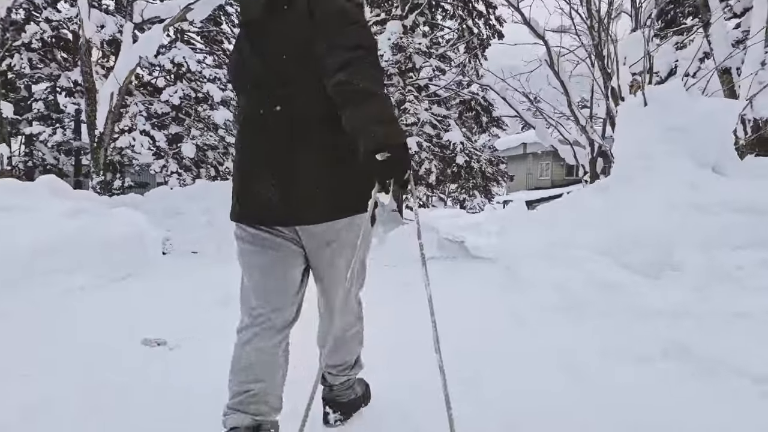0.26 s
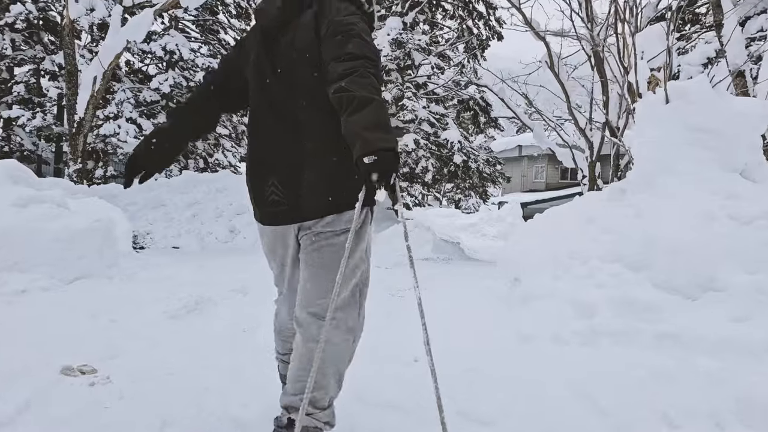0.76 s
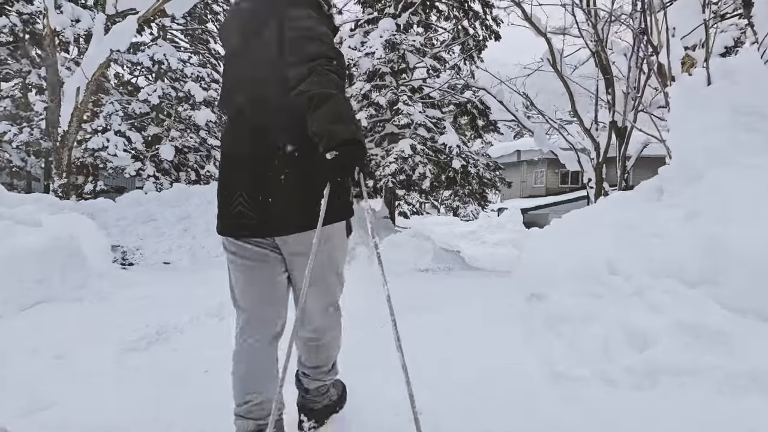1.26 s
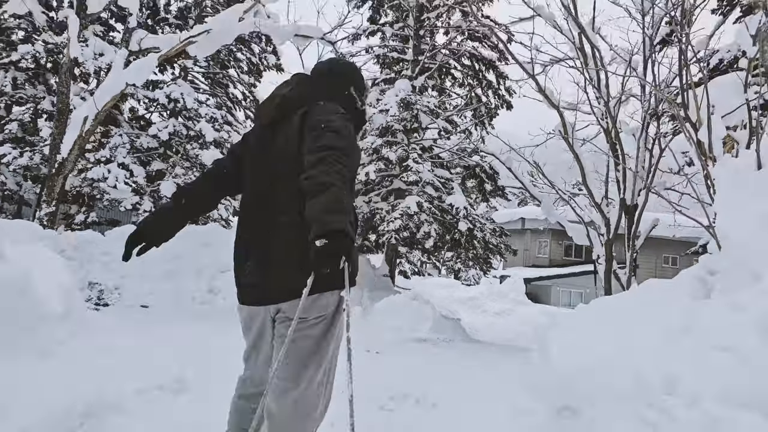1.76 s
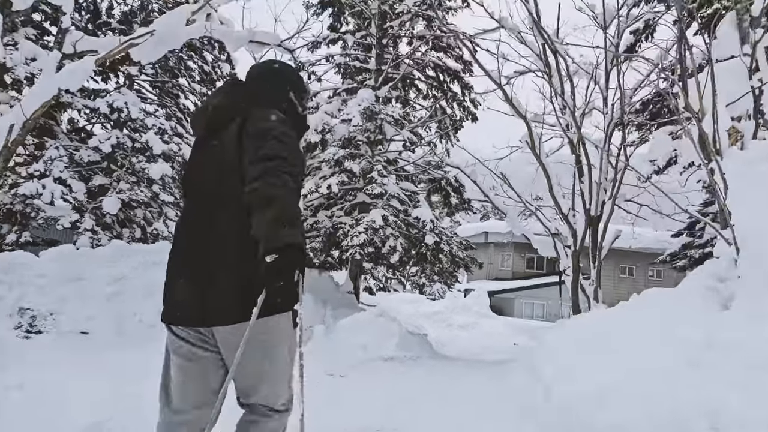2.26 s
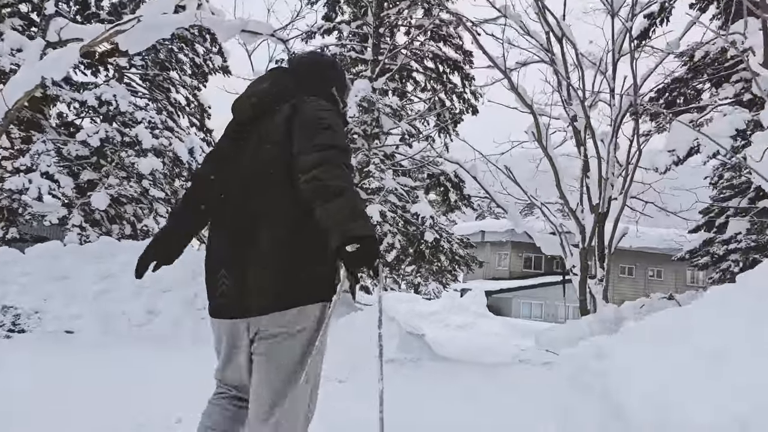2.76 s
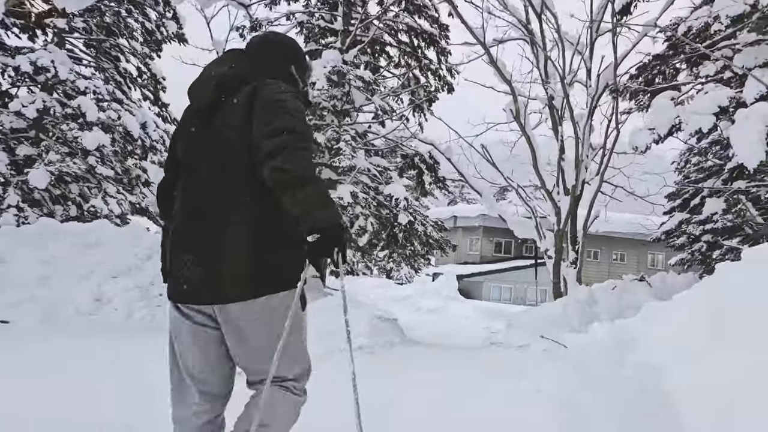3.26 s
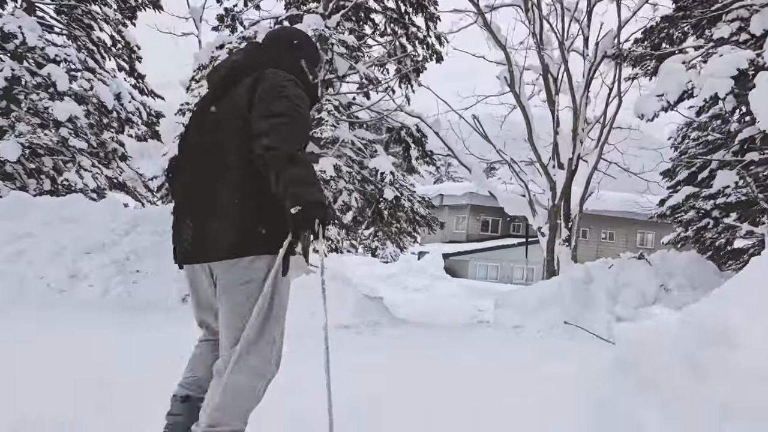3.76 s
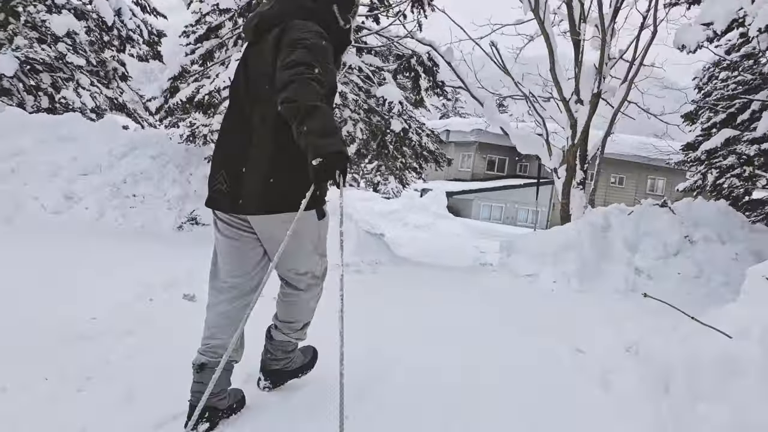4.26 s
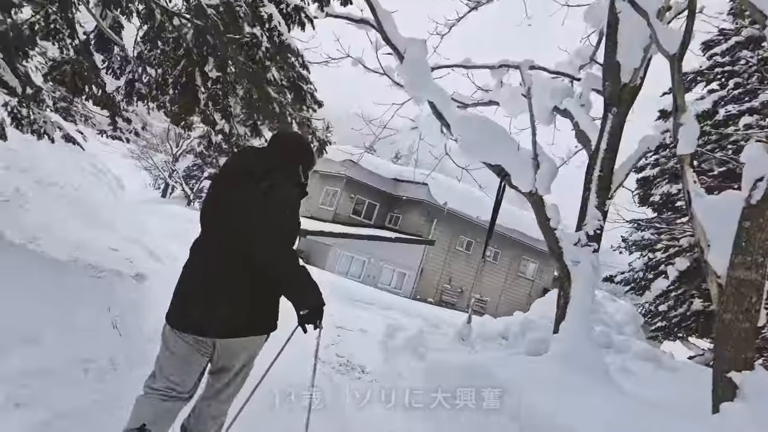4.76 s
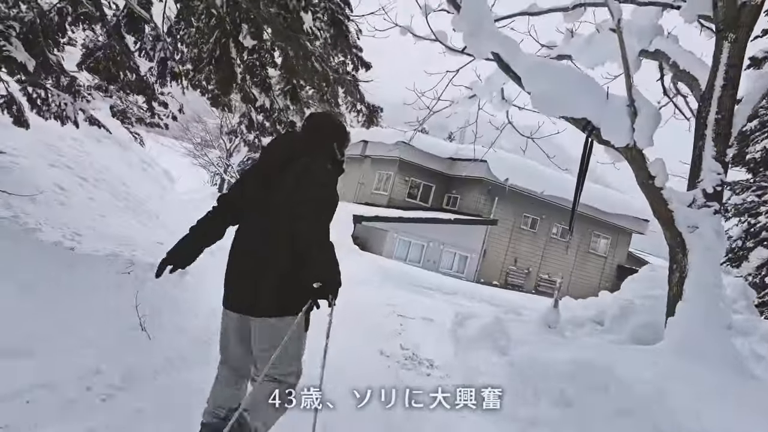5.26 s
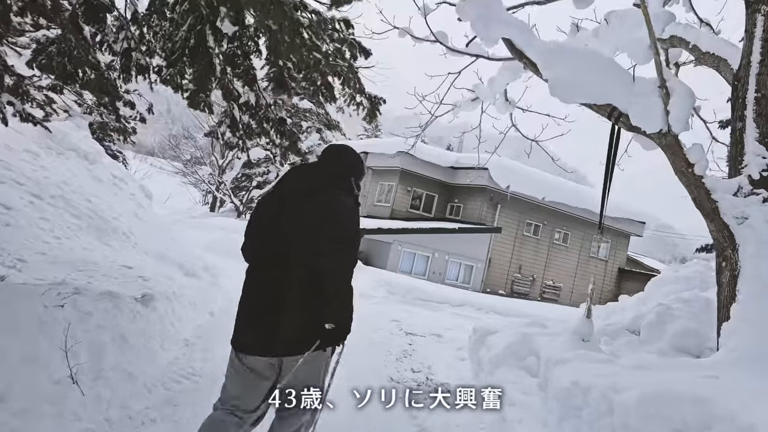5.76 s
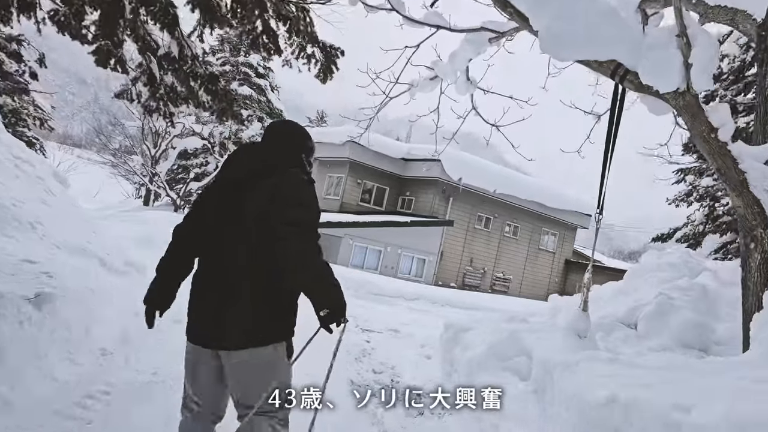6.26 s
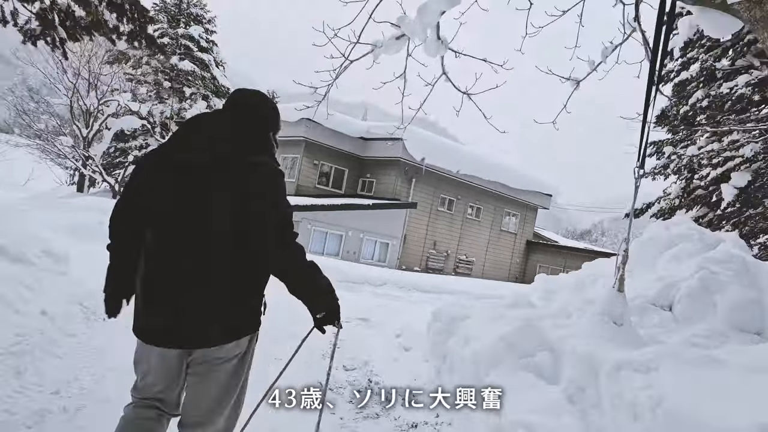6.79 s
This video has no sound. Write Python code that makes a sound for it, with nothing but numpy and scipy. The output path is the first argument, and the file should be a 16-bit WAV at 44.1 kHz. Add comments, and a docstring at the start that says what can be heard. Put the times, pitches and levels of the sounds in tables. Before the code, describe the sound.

Close, low hull knocks and uneven scraping from a plastic sled dragged through snow, with icy ticks, soft powder hiss and wind thumps.

```python
"""On lumpy snow, a hollow plastic sled is towed along, heard close up by a small stereo camera riding on it.
Shaped noise makes the hull rumble, crunch and jolt; lumps ring it as short decaying sine pairs.
Crust cracks and icy grains tick as dying noise bursts, and powder hisses in two bands of noise.
The camera swings round partway and hears the powder from the other side.
Low noise, almost unrelated left to right, is the wind buffeting the two microphone ports."""
import sys
import numpy as np
from scipy.fft import rfft, irfft, next_fast_len
from scipy.io import wavfile
from scipy.ndimage import map_coordinates

SR = 44100
rng = np.random.default_rng(int(sys.argv[2]) if len(sys.argv) > 2 else 0)


def file_out(sig):
    """Save sig as 16-bit WAV at sys.argv[1]."""
    # one column per channel
    cols = np.atleast_2d(sig).T
    # limit, then scale
    lim = np.clip(cols, -1, 1)
    pcm = np.round(lim * 32767).astype(np.int16)
    wavfile.write(sys.argv[1], SR, pcm)


N = 310023

# upper modes of the hull's shell, rung by breaking crust: (centre [Hz], width [Hz], level [dB])
SHELL_MODES = [(493, 83.5, 2), (713, 296, -2.5), (875, 400, -6.5), (1425, 300, -14.5), (1780, 600, -21.5)]


def amp(db):
    """Decibels to a linear gain."""
    return 10 ** (np.asarray(db) / 20)


def unit(x):
    """The signal scaled to an RMS of one."""
    return x / np.sqrt(np.mean(x ** 2) + 1e-20)


def along(points, hz):
    """Values read from (frequency [Hz], value) points on a log frequency axis."""
    f, v = np.transpose(points)
    return np.interp(np.log(hz + 1), np.log(f + 1), v)


def curves(rows):
    """One value per sample for each column after the time."""
    s, *cols = np.transpose(rows)
    return [np.interp(np.arange(N) / SR, s, c) for c in cols]


def bells(events):
    """Sum of bell curves around each (time [s], height, length [s])."""
    t = np.arange(0, N, 64) / SR  # a coarse grid is enough for such slow curves
    s, height, length = np.transpose(events)[:, :, None]
    total = (height * np.exp(-((t - s) / length) ** 2)).sum(0)
    return np.interp(np.arange(N) / SR, t, total)


def swells(events):
    """Gain that rises and falls around each (time [s], level [dB], length [s])."""
    return bells([(s, amp(db), length) for s, db, length in events])


def wobble(rate):
    """A smooth random curve with rate knots a second."""
    knots = rng.standard_normal(int(N * rate / SR) + 4)
    return map_coordinates(knots, [np.arange(N) * rate / SR])


def gritty(grit_db, rate):
    """Two noises whose shared strength jumps about, as grains catch and break."""
    return rng.standard_normal((2, N)) * amp(grit_db * wobble(rate))


def filtered(x, response):
    """The signal times a complex response of frequency."""
    m = next_fast_len(N + SR // 2)
    spectrum = rfft(x, m) * response(np.fft.rfftfreq(m, 1 / SR))
    return irfft(spectrum, m)[..., :N]


def body(modes):
    """Causal response of a set of resonances, with alternating signs."""
    def response(f):
        total = 0
        for k, (centre, width, db) in enumerate(modes):
            damping = 1j * f * width
            total = total + (-1) ** k * amp(db) * damping / (centre * centre - f * f + damping)
        return total
    return response


def spread(pair, alike):
    """Two unrelated signals mixed to left and right with a likeness per frequency."""
    def mix(hz):
        turn = np.arccos(np.clip(along(alike, hz), -1, 1)) / 2
        return np.array([np.cos(turn), np.sin(turn)])
    mid, side = filtered(pair, mix)
    return np.array([mid + side, mid - side])


def spread_out(size, alike):
    """A short stereo noise whose sides are partly alike."""
    mid, side = rng.standard_normal((2, size))
    turn = np.arccos(np.clip(alike, -1, 1)) / 2
    return np.cos(turn) * mid + np.sin(turn) * np.outer([1, -1], side)


def panned(db):
    """Left and right gains for a left-right difference."""
    return amp([[db / 2], [-db / 2]])


def scraping():
    """Small lumps drive the low hull modes, breaking crust the upper ones, and the load shakes the sled."""
    # how hard the hull drags: (time [s], rumble level [dB])
    drag = [(0.0, -40.5), (0.47, -41.5), (0.72, -46), (0.88, -40), (1.13, -40.5), (1.41, -33), (1.57, -31),
            (1.98, -42.5), (2.21, -39), (2.33, -39.5), (2.72, -43), (3.33, -31), (3.41, -32), (3.78, -33.5),
            (4.44, -36.5), (5.29, -33), (5.54, -32.5), (5.82, -37.5), (6.01, -35), (6.13, -32.5),
            (6.27, -36.5), (6.4, -36), (6.73, -32), (7.03, -35)]
    # the hull skips clear of the snow for a moment: (time [s], depth [dB], length [s])
    lulls = [(0.35, 11, 0.042), (0.62, 1.5, .06), (0.89, 5, .02), (1.15, 4.5, 0.026), (1.29, 7, 0.038),
             (1.37, 9, 0.019), (1.5, 12, 0.016), (2.08, 8, 0.073), (3.07, 7, 0.022), (3.28, 9, 0.12),
             (3.56, 14.5, 0.043), (4.0, 4, 0.018), (4.32, 9, 0.028), (4.6, 4, 0.055), (4.9, -1, .03),
             (5.075, 3, .015), (5.21, 0, .015), (5.89, 11.5, 0.044), (6.33, 6, 0.039), (6.56, 7, 0.077),
             (6.96, 4.5, 0.041)]
    # crust scraping along the shell: (time [s], level [dB], length [s])
    scrapes = [(0.78, -49, 0.026), (1.07, -48, 0.012), (1.32, -41, .012), (1.45, -62, 0.035),
               (1.54, -37, 0.01), (1.7, -55, 0.049), (1.98, -49, 0.029), (2.28, -53, 0.015),
               (2.45, -50, 0.036), (3.19, -54, 0.023), (3.415, -39.5, 0.043), (4.23, -52, 0.053),
               (4.56, -46, 0.01), (4.74, -46, 0.03), (4.99, -41, 0.043), (5.04, -36.5, 0.02),
               (5.105, -36.5, 0.021), (5.18, -36, 0.021), (5.235, -39, 0.014), (5.385, -39, 0.019),
               (5.57, -47, 0.011), (5.49, -46, 0.1), (5.99, -55, 0.038), (6.11, -44, 0.028),
               (6.41, -49.5, 0.052), (6.77, -39, 0.0083), (6.83, -40, .035)]
    # the load lurching on the hull: (time [s], level [dB])
    jolts = [(0.0, -35), (0.251, -37), (0.48, -34), (0.84, -29.5), (1.09, -36), (1.25, -39), (1.35, -38),
             (1.42, -25.5), (1.72, -41), (1.98, -41), (2.29, -39.5), (2.45, -36.5), (2.74, -36.5),
             (2.991, -32), (3.189, -26.5), (3.33, -34), (3.49, -39), (3.68, -40), (3.949, -45), (4.32, -31),
             (4.42, -43), (4.7, -29), (4.82, -27.5), (4.95, -52), (5.15, -34), (5.62, -35), (5.85, -35.5),
             (5.99, -45), (6.21, -40), (6.4, -34.5), (6.56, -33), (6.79, -39), (6.95, -37)]
    # low modes of the hull: (centre [Hz], width [Hz], level [dB])
    hull_modes = [(130, 19, -12.5), (176, 24.5, -4.5), (226.6, 26, -1), (297, 64, -5), (372, 77, -8.5),
                  (443, 130, -14)]
    # how alike the hull sounds at the two microphone ports: (frequency [Hz], likeness [0-1])
    hull_alike = [(100, 1), (300, 0.96), (640, 0.68), (1400, 0.16), (2500, 0)]
    # spectrum shape of the load shaking on the hull: (frequency [Hz], relative level per Hz [dB])
    thud = [(12, -34), (25, -15), (45, -3.5), (80, -2.5), (130, -4), (220, -22.5), (400, -120)]
    uneven_db = 0.54  # chance unevenness of the drag
    crunch_db, crunch_grows = -50.5, 0.61  # crunch at the mean drag level; its swing in dB per dB of drag
    jolt_s, shake_db = 0.024, -5.5  # length of a lurch; shaking between lurches, relative to the rumble

    drag_db, = curves(drag)
    drag_db = drag_db + uneven_db * wobble(10) - bells(lulls)
    crust = amp(crunch_db + crunch_grows * (drag_db - drag_db.mean())) + swells(scrapes)
    lurch = amp(drag_db + shake_db) + swells([(s, db, jolt_s) for s, db in jolts])

    soft = lambda hz: body(hull_modes)(hz) / (1 + 1j * hz / 900) ** 2  # powder cushions the contact
    shell = lambda hz: body(SHELL_MODES)(hz) * hz / (hz + 300)
    rumble = unit(filtered(gritty(grit_db=3.6, rate=46), soft))
    crunch = unit(filtered(gritty(grit_db=3, rate=70), shell))
    jolt = unit(filtered(gritty(grit_db=1.6, rate=12)[0], lambda hz: amp(along(thud, hz))))
    hull = spread(amp(drag_db) * rumble + crust * crunch, hull_alike)
    return hull * panned(-0.86) + lurch * jolt  # the jolt is the same on both sides


def powder(stance, band, grit_db, rate):
    """One band of powder hiss as it reaches the two ports, in stance 0 (before the turn) or 1 (after)."""
    # hiss spectrum shape in each stance: (frequency [Hz], relative level per Hz [dB])
    hiss_shape = [
        [(710, -11.5), (1200, -2), (1320, -3.5), (1520, -9), (1870, -6), (2260, -8), (3520, -6), (3960, -7),
         (6780, -11.5), (7470, -11), (8140, -14), (11550, -8.5), (12800, -14.5), (15000, -14.5), (15700, -16)],
        [(710, -21.5), (1200, -10), (1430, -5), (1550, -5), (1710, -13.5), (2080, -3.5), (2440, -13),
         (3060, -5.5), (5180, -6), (5900, -10.5), (7550, -10), (8780, -11), (10300, -6), (11600, -6.5),
         (15700, -15)],
    ]
    # left over right in each stance: (frequency [Hz], left-right difference [dB])
    lean = [
        [(1200, -1), (2000, -0.5), (3000, 1), (8300, 1.5), (9300, -6), (10500, -7), (11600, -6), (12500, -3),
         (13500, -1), (14500, 2), (15500, 0)],
        [(1200, -3), (1900, -9.5), (2400, 4), (3100, 5.5), (4100, 2), (5000, 3.5), (6000, 1.5), (8500, 3),
         (9300, -1.5), (10500, -0.5), (11500, -9), (12500, 11), (13300, -3), (14200, 9), (15500, 5)],
    ]
    # phase by which left leads right in each stance: (frequency [Hz], lead [radians])
    lead = [
        [(800, 1), (1700, -2.5), (2400, -2.5), (3500, -1.6), (4400, -2), (9000, -4), (10500, -4), (12000, -5.5),
         (14800, -4)],
        [(500, 7), (1000, 1), (2500, 2.5), (3200, 1.06), (8000, 2), (9000, 4.5), (11000, 2.5), (13000, 3),
         (15500, 6)],
    ]
    # how alike the two ports hear the hiss in each stance: (frequency [Hz], likeness [0-1])
    powder_alike = [
        [(1500, 0.48), (2400, 0.77), (4000, 0.046), (10000, 0.13), (14000, 0.12)],
        [(1500, 1), (2800, 0.64), (4000, 0.82), (7500, 0.25), (10300, 0.57), (13500, .35)],
    ]
    # the microphone port's resonance: (centre [Hz], width [Hz], height [dB])
    port = (11600, 350, 3)
    centre, width, height_db = port

    def ports(f):
        tone_db = along(hiss_shape[stance], f) + height_db * np.exp(-((f - centre) / width) ** 2)
        half = amp(along(lean[stance], f) / 2) * np.exp(.5j * along(lead[stance], f))
        return amp(tone_db) * band(f) * np.array([half, 1 / half])

    hiss = filtered(spread(gritty(grit_db, rate), powder_alike[stance]), ports)
    return hiss / np.sqrt(np.mean(hiss.mean(0) ** 2))  # the mean of left and right has unit RMS


def sliding():
    """Powder hisses in a fine and a duller part that swell separately and drift from side to side."""
    # fine snow sliding past: (time [s], fine hiss level [dB], duller part level [dB])
    slide = [(0.0, -52.5, -58.5), (0.47, -53.5, -57), (1.37, -52.5, -56), (1.55, -56, -61),
             (2.21, -55.5, -58), (2.45, -52.5, -54.5), (2.98, -53.5, -59), (3.39, -52.5, -58),
             (3.58, -53.5, -57), (4.07, -52.5, -56), (4.32, -56, -60.5), (4.52, -56.5, -53.5),
             (4.7, -50.5, -54), (5.05, -48, -49.5), (5.19, -46, -48.5), (5.42, -51, -52.5),
             (5.7, -52.5, -56.5), (5.99, -48.5, -55.5), (6.81, -50.5, -55), (7.03, -49, -54)]
    # powder thrown up in short sprays: (time [s], level [dB])
    sprays = [(0.21, -54.5), (0.48, -50.5), (0.8, -53), (1.31, -52.5), (1.45, -55), (1.72, -53),
              (1.94, -50.5), (2.29, -52.5), (2.82, -63), (2.92, -58), (3.17, -51), (3.43, -52.5),
              (3.95, -52.5), (4.48, -56), (4.56, -51), (4.7, -48.5), (4.76, -60), (4.95, -47), (5.03, -49),
              (5.11, -51), (5.19, -44), (5.38, -46), (6.44, -52), (6.87, -49)]
    turn_s = 4.55  # the camera swings round and hears the powder from the other side
    spray_s, spray_dull_db = 0.026, -4  # length of a spray; its duller part relative to the fine part
    lean_before_db, lean_after_db = -2, 1  # left-right difference about which the hiss drifts

    fine_db, dull_db = curves(slide)
    flicker = wobble(5.9)
    turned = np.arange(N) > turn_s * SR
    spray = swells([(s, db, spray_s) for s, db in sprays])
    drift_db = np.where(turned, lean_after_db, lean_before_db) + 2.9 * wobble(9.1)

    # the two bands cross at 7500 Hz and their powers add up to one
    high = lambda hz: np.sqrt(1 / (1 + (7500 / (hz + 1)) ** 8))
    low = lambda hz: np.sqrt(1 - high(hz) ** 2)
    fine_after = powder(1, high, grit_db=0.7, rate=90)
    fine_before = powder(0, high, grit_db=0.5, rate=130)
    dull_after = powder(1, low, grit_db=1.07, rate=87)
    dull_before = powder(0, low, grit_db=1.16, rate=72)

    fine_gain = np.hypot(amp(fine_db + 0.76 * flicker), spray)
    dull_gain = np.hypot(amp(dull_db + 1.5 * flicker), amp(spray_dull_db) * spray)
    fine = fine_gain * np.where(turned, fine_after, fine_before)
    dull = dull_gain * np.where(turned, dull_after, dull_before)
    return (fine + dull) * amp([drift_db / 2, -drift_db / 2])


def wind():
    """Eddies thump the two ports with almost unrelated low noise that swells on both together."""
    # wind at the microphone: (time [s], buffet level [dB])
    gusts = [(0.0, -58), (0.36, -64), (0.6, -54), (1.02, -38.5), (1.25, -53), (2.3, -54), (2.62, -42),
             (3.1, -56), (3.3, -47), (3.58, -59), (3.84, -41), (4.15, -48.5), (4.56, -32.5), (4.82, -28),
             (5.02, -54), (5.16, -36), (5.3, -55), (5.42, -39), (5.7, -39.5), (6.25, -42), (6.46, -43),
             (6.6, -35.5), (6.82, -50), (6.96, -32.5), (7.03, -48)]
    # spectrum shape of the buffeting: (frequency [Hz], relative level per Hz [dB])
    buffet = [(8.8, -42), (15, -23), (43, 3), (65, -2), (125, -6.5), (180, -18), (260, -16), (400, -50),
              (550, -120)]
    buffet_db, = curves(gusts)
    eddies = unit(filtered(gritty(grit_db=1.5, rate=16), lambda hz: amp(along(buffet, hz))))
    return amp(buffet_db) * spread(eddies, [(60, 0.033)])  # one likeness at every frequency


def bumps():
    """Each hard lump rings the loaded hull briefly at its pitch and one inharmonic overtone."""
    # lumps hitting the hull: (time [s], peak level [dB], pitch [Hz], overtone against pitch [dB])
    lumps = [(0.13, -34.5, 227, -10), (0.22, -28, 188, -11), (0.427, -20, 237, -10), (0.447, -18, 165, -1),
             (0.696, -23, 196, -2), (0.744, -22.5, 187, -11), (0.769, -22, 175, -4),
             (0.827, -27.5, 222.5, -19.5), (0.928, -27.5, 237, -19), (1.068, -25, 195, -11),
             (1.228, -31, 247, -21), (1.322, -21, 240, -16), (1.411, -13.5, 198, -22),
             (1.444, -18, 193, -14), (1.524, -10.5, 219, -19), (1.602, -28, 177, -14),
             (1.629, -19, 158, -19), (1.652, -12.5, 227, -9), (1.675, -15.5, 204.4, -12),
             (1.712, -16.5, 195, -9.5), (1.95, -23.5, 230, -19), (2.441, -24, 178, -19),
             (3, -15.5, 171.4, -7.5), (3.175, -15.5, 192, -4.5), (3.209, -26, 211, -17),
             (3.33, -9, 219.6, -10.5), (3.346, -12, 223, -17), (3.393, -16.5, 220, -8),
             (3.441, -21.5, 241, -12), (3.607, -27, 235, -7), (3.648, -22.5, 243, -5.5),
             (3.7, -19.5, 216, -5), (3.748, -27, 228, -20), (4.124, -23.5, 212, -2),
             (4.249, -24, 221, -4.5), (4.441, -20.5, 192, 4), (4.505, -21.5, 209, -11),
             (4.682, -18, 216, -8), (4.745, -18.5, 193, -0.5), (4.779, -19, 221, -3.5),
             (4.859, -36, 267, -5), (5.032, -15, 174, -1), (5.104, -16.5, 212, -2),
             (5.131, -11.5, 214, -10.5), (5.253, -20, 143, -14), (5.332, -22, 152, -6),
             (5.384, -22.5, 229, 5), (5.562, -21, 275, -14), (5.608, -8, 215, -10), (5.772, -28, 289, -18),
             (5.953, -27.5, 275, -22), (6.081, -25, 200, -13), (6.267, -25.5, 188, -19),
             (6.363, -23, 230, -18), (6.434, -26, 274, -19), (6.668, -24.5, 223, -8), (6.757, -24, 232, -7),
             (6.796, -19, 208, -9), (6.839, -24, 218, -4)]
    pitch_t60_s, over_t60_s = 0.097, 0.065
    ring = np.zeros(N + SR)
    t = np.arange(SR // 4) / SR
    press = (1 - np.exp(-t / 0.00078)) ** 2  # the lump is squeezed before it gives way
    for s, db, hz, over_db in lumps:
        swing = amp(-60 * t / pitch_t60_s) * press * np.sin(2 * np.pi * hz * t - 2.5)
        swing += amp(over_db - 60 * t / over_t60_s) * press * np.sin(2 * np.pi * 1.748 * hz * t - 1.5)
        ring[round(s * SR):][:len(t)] += amp(db) * swing / abs(swing).max()
    return ring[:N] * panned(-0.95)


def cracks():
    """A sharp blow with a dying crumble behind it, heard through the shell; ticks are one short snap."""
    # crust breaking against the shell: (time [s], level before the shell [dB], left-right difference [dB])
    breaks = [(0.448, -42, -21), (0.696, -44, -8), (1.445, -34, 2), (1.524, -31, 0), (1.599, -50, 2),
              (1.656, -33, -1.5), (2.58, -37, -1.5), (3.0, -38, -3), (3.181, -33, 1), (3.333, -28, -5),
              (3.397, -32, -3), (3.708, -34, 3), (4.112, -41, 0), (4.248, -35, -12), (4.441, -24, -6.5),
              (4.549, -48, 9), (4.689, -33, -4), (4.959, -32, 4), (5.037, -24.5, 4), (5.331, -31, -8),
              (5.608, -23.5, -2), (5.96, -29.5, -7), (6.041, -35.5, -11), (6.405, -28, -1),
              (6.435, -28, -5), (6.669, -31, -4), (6.794, -37, 4), (7.002, -41, 6)]
    # icy grains snapping: (time [s], level before filtering [dB], left-right difference [dB])
    snaps = [(1.449, -31, 12), (1.539, -32, 7), (1.7194, -49, -1.5), (3.437, -37, -6), (4.4402, -30, 2),
             (4.55, -30, 10), (4.6856, -29, 7), (4.97, -31, 2.0), (5.019, -30, 2.0), (5.103, -24, 1),
             (5.11, -25, 3.0), (5.174, -27, 3), (5.3735, -31, 2.0), (6.4022, -44, 2.0), (6.43, -30, 7),
             (6.6756, -31, 3.5), (6.7664, -36, 2.0), (6.7992, -23.5, 5)]
    crack_t60_s, tick_t60_s = 0.096, 0.011
    crack, tick = np.zeros((2, 2, N + SR))
    t = np.arange(SR // 8) / SR
    for s, db, pan_db in breaks:
        crumble = amp(-60 * t / crack_t60_s) * spread_out(len(t), alike=0.66)
        crumble[:, :6] += 3.5  # the blow itself
        crack[:, round(s * SR):][:, :len(t)] += amp(db) * panned(pan_db) * crumble
    for s, db, pan_db in snaps:
        snap = amp(-60 * t / tick_t60_s) * spread_out(len(t), alike=0.18)
        tick[:, round(s * SR):][:, :len(t)] += amp(db) * panned(pan_db) * snap
    # packed snow rounds the blow
    blunt = lambda hz: amp(15) * body(SHELL_MODES)(hz) / (1 + 1j * hz / 1800) ** 2
    grain = body([(2700, 2100, 0)])  # one broad resonance: centre [Hz], width [Hz], level [dB]
    return filtered(crack[:, :N], blunt) + filtered(tick[:, :N], grain)


def scene():
    """All the sounds of the towed sled together, in stereo."""
    return scraping() + sliding() + wind() + bumps() + cracks()


def record(dry):
    """The camera keeps nothing above its band limit."""
    top_hz = 15800
    return filtered(dry, lambda hz: hz < top_hz)


dry = scene()
out = record(dry)
file_out(out)
```